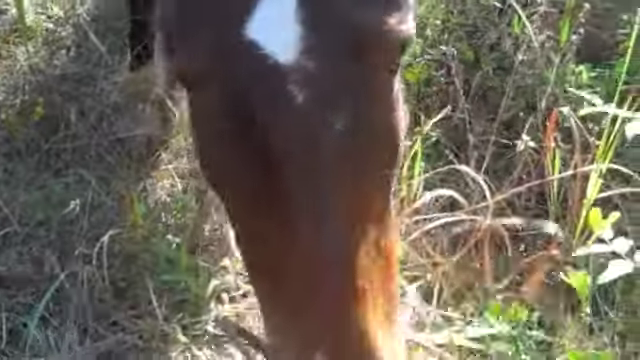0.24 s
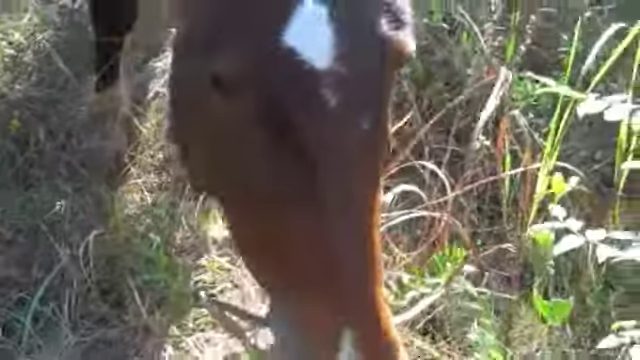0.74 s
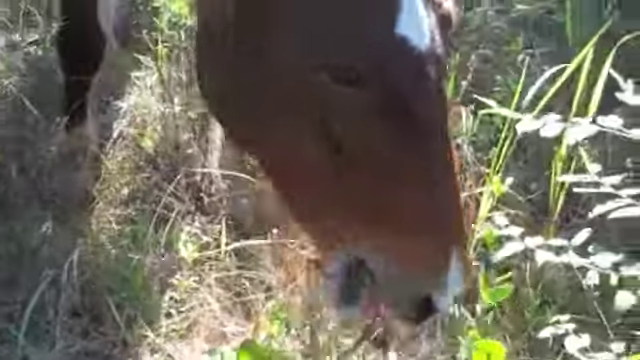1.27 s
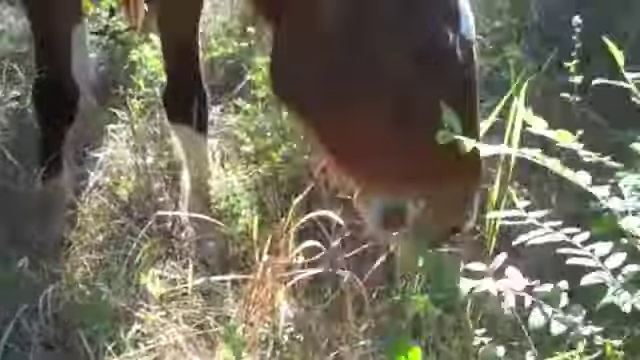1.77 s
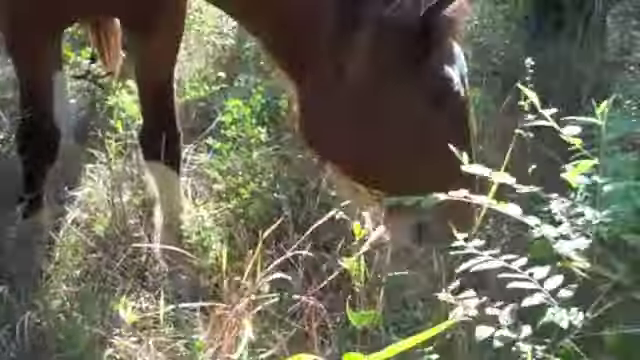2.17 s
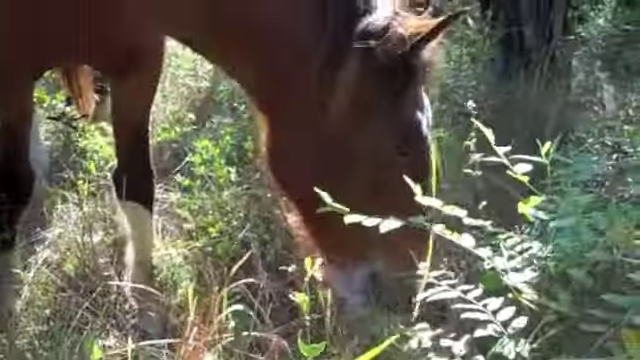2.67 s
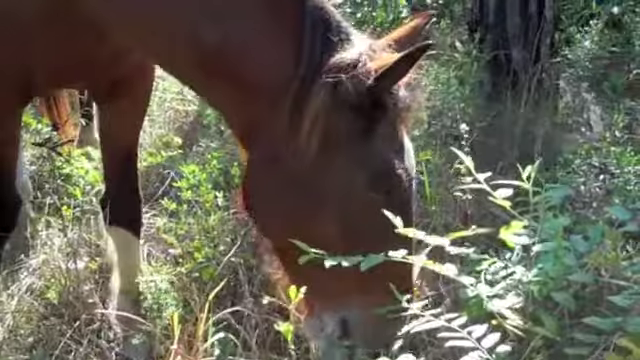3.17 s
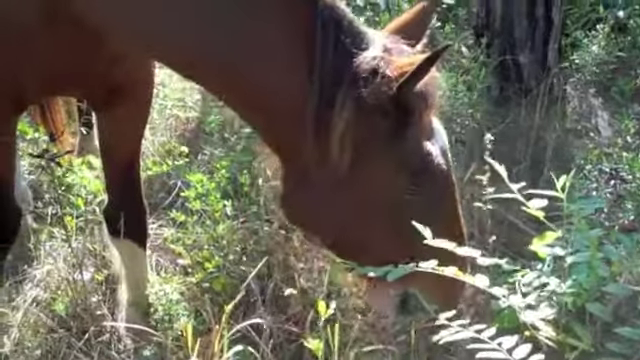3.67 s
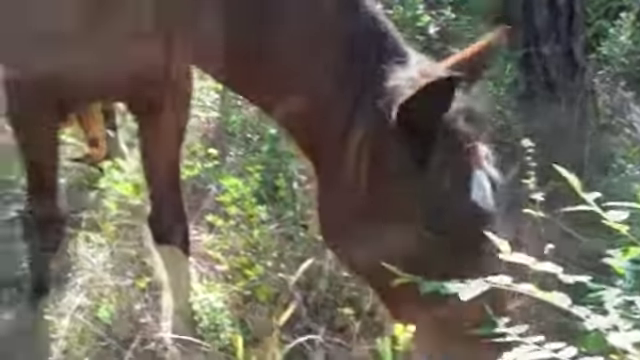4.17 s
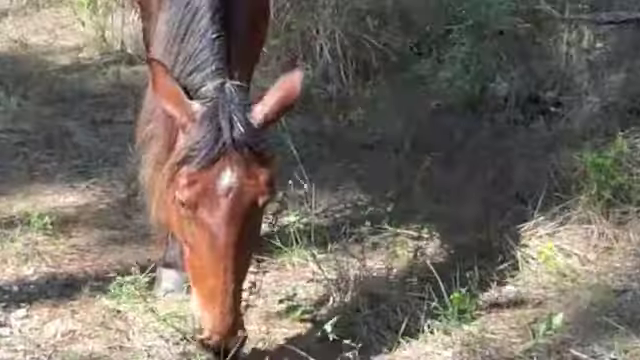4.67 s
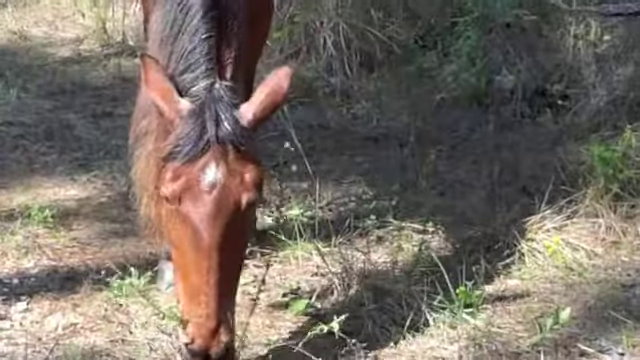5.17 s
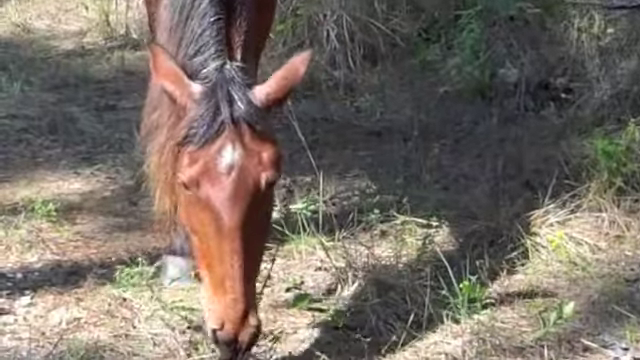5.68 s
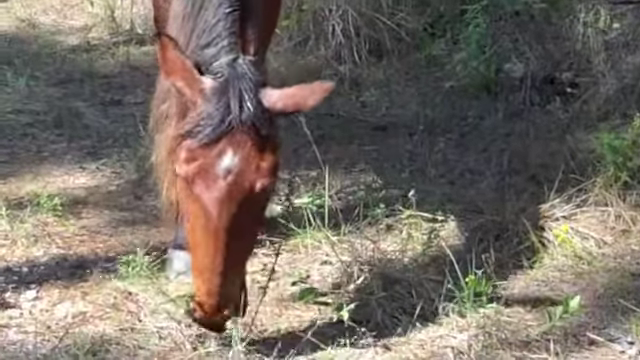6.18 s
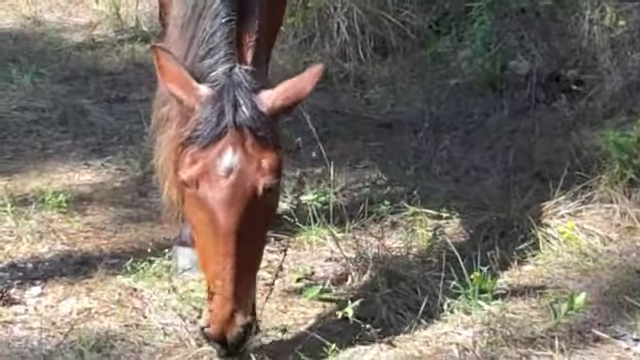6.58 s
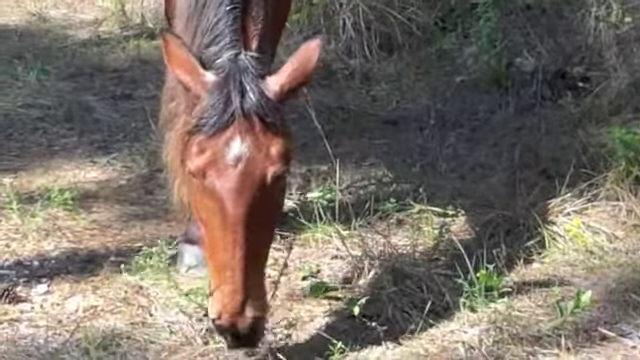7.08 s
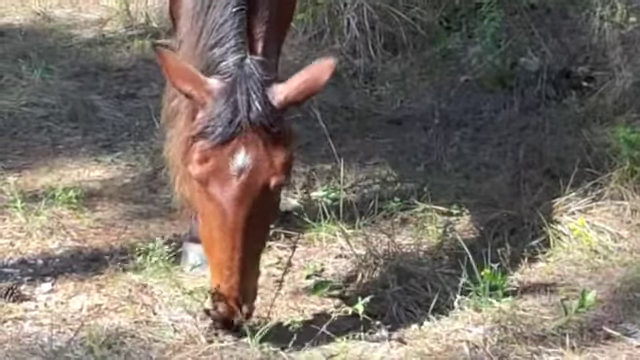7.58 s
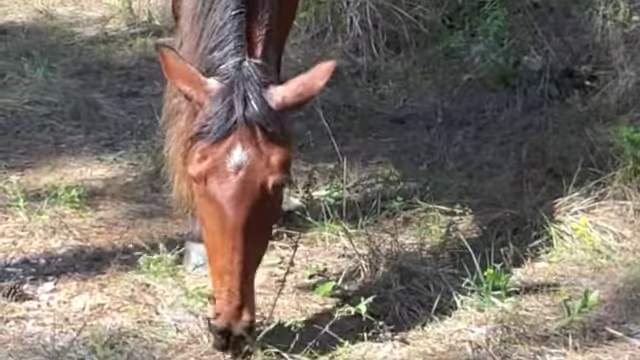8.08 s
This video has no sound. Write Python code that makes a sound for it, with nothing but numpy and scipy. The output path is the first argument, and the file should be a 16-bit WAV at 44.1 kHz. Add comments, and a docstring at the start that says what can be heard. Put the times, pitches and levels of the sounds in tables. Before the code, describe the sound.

A horse close by tears and munches brush in crisp crackling crunches, then after a cut nibbles short grass much more softly as a bird chips.

```python
"""A horse grazes in brush close to a small camera: leaves and stalks crackle as uneven noise, stems snap and teeth
knock as short decaying tones, the jaw grinds and the mouthful squelches as low crackle bands.
Lumpy low noise makes wind puffs on the microphone ports; a murmur of air fills the wood. The near view stops short
and a farther one fades in: softer nibbling of short grass, chips of a bird (falling tones with a noisy echo) and
a far twitter (a fluttering narrow noise band)."""
import sys
import numpy as np
from scipy import signal
from scipy.fft import rfft, irfft, next_fast_len
from scipy.io import wavfile
from scipy.ndimage import uniform_filter1d, map_coordinates

SR = 44100
rng = np.random.default_rng(int(sys.argv[2]) if len(sys.argv) > 2 else 0)


def to_wav(sig):
    """Store sig (one row per channel, or 1-D mono) as 16-bit WAV at the path in sys.argv[1].

    Samples outside -1..1 are clipped; the rate is SR.
    """
    pcm = np.clip(np.atleast_2d(sig), -1, 1) * 32767
    pcm = np.round(pcm).astype(np.int16)
    wavfile.write(sys.argv[1], SR, pcm.T)  # frames by channels


N = 367353

CUT_S = 4.197  # the near view ends and the far view starts


def amp(db):
    """Gain of a level in dB."""
    return 10 ** (np.asarray(db) / 20)


def unit(x):
    """Bring x to rms 1."""
    return x / np.sqrt(np.mean(x ** 2) + 1e-20)


def along(points, hz):
    """Read (frequency [Hz], value) points on a log frequency axis."""
    point_hz, value = np.transpose(points)
    return np.interp(np.log(hz + 1), np.log(point_hz + 1), value)


def curves(rows):
    """One value per sample for each column after the time."""
    s, *columns = np.transpose(rows)
    return [np.interp(np.arange(N) / SR, s, column) for column in columns]


def wobble(rate):
    """A smooth random curve with rate knots a second."""
    knots = rng.standard_normal(int(N * rate / SR) + 4)
    return map_coordinates(knots, [np.arange(N) * rate / SR])


def filtered(x, response):
    """Shape x by a response over frequency, complex if it shifts phase."""
    size = next_fast_len(N + 8192)
    spectrum = rfft(x, size) * response(np.fft.rfftfreq(size, 1 / SR))
    return irfft(spectrum, size)[..., :N]


def spread(pair, spectrum, alike):
    """Colour two unrelated signals and mix them to a left-right likeness, at rms 1."""
    def mid_side_gains(hz):
        turn = np.arccos(np.clip(along(alike, hz), -1, 1)) / 2
        return amp(along(spectrum, hz)) * np.array([np.cos(turn), np.sin(turn)])

    mid, side = filtered(pair, mid_side_gains)
    return unit(np.array([mid + side, mid - side]))


def swells(rows, rest_db):
    """Level in dB for each column: every event swells and fades, adding its power to the rest level."""
    rise_share = 0.73  # a swell rises in this share of its fading time
    roundness = 1.28  # 1 = pointed peak, 2 = round
    t, rows = np.arange(0, N / SR + .002, .002), np.array(rows)
    fade_s = np.maximum(rows[:, 1:2], .005)  # zero and negative times become 5 ms
    since = (t - rows[:, :1]) / fade_s
    shape = amp(-20 * np.maximum(since, -since / rise_share) ** roundness)  # a power: -10 dB at since = 1
    event_power = amp(2 * rows[:, 2:].T) @ shape
    power = [np.interp(np.arange(N) / SR, t, p) for p in event_power]
    return 10 * np.log10(power + amp(2 * np.asarray(rest_db)))


def murmur():
    """Far air in the trees and the hiss of the microphone: coloured noise, gently unsteady."""
    # colour of the wood: (frequency [Hz], relative level per Hz [dB])
    wood = [(35, -49), (60, -12.5), (125, -10.5), (315, -6.5), (397, -3), (690, -0.5), (953, -5.5),
            (1090, -6), (1380, -9.5), (1780, -11), (4680, -20.5), (7080, -19), (9330, -24.5),
            (13500, -24.5), (14800, -44)]
    # stereo width: (frequency [Hz], left-right likeness [-1 to 1])
    alike = [(60, -0.76), (180, 0.26), (550, 0.86), (1640, 0.079), (4960, -0.81), (14900, 0.45)]
    # balance: (frequency [Hz], left over right [dB])
    left = [(60, 8), (240, 4.5), (950, 0), (3760, 4), (14900, -8)]
    near_db, far_db = -54.5, -57
    air_db = np.where(np.arange(N) / SR < CUT_S, near_db, far_db)
    air = spread(rng.standard_normal((2, N)), wood, alike)
    balanced = filtered(air, lambda hz: amp([[.5], [-.5]] * along(left, hz)))
    return amp(air_db + 0.79 * wobble(6.2)) * balanced


def twitter():
    """A far bird, blurred by the wood into a fluttering narrow band of noise."""
    # calls: (peak time [s], time to fade by 10 dB [s], peak level [dB])
    calls = [(5.56, .06, -64), (5.72, 0.2, -66), (5.85, 0.2, -72), (6.2, -0.5, -76)]
    level_db = swells(calls, -100)
    band = [(2300, -30), (2750, -4), (3000, 5), (3200, -5), (3600, -34)]  # (Hz, relative dB)
    noise = spread(rng.standard_normal((2, N)), band, [(3000, 0.67)])
    return amp(level_db + 3.3 * wobble(32)) * noise


def bird():
    """A short falling chip, smeared by the many trunks that send it back."""
    # chips: (time [s], level [dB], settled pitch [Hz], left over right [dB])
    chips = [(4.704, -40.5, 7080, 4), (5.943, -45.5, 6820, 4), (7.341, -48, 6930, 3)]
    out = np.zeros((2, N + SR))
    t, late = np.arange(SR // 50) / SR, np.arange(SR // 3) / SR
    for s, db, hz, pan_db in chips:
        pitch = hz * (1 + 0.095 * np.exp(-t / 0.0029))
        swell = np.sin(np.pi * t / t[-1]) ** 0.29
        chip = swell * np.sin(2 * np.pi * np.cumsum(pitch) / SR)
        trunks = 0.037 * amp(-60 * late / 0.25) * rng.standard_normal((2, len(late)))
        trunks[:, 0] = 1  # the direct sound
        heard = signal.fftconvolve(chip[None], trunks, axes=1)
        gain = amp(db + np.array([[pan_db], [-pan_db]]) / 2)
        out[:, round(s * SR):][:, :heard.shape[1]] += gain * heard
    return out[:, :N]


def wind():
    """Lumpy puffs of low noise, unrelated from port to port."""
    # puffs: (peak time [s], time to fade by 10 dB [s], peak level [dB])
    gusts = [(.08, 0.1, -58), (.69, -0.01, -44), (1.13, 0, -56), (1.35, 0.1, -60), (2.15, .04, -58),
             (2.34, 0.07, -52.5), (2.77, 0.1, -61), (3.2, .04, -54), (3.3, 0.09, -47), (3.5, .06, -54),
             (3.63, 0.16, -51), (4.06, 0.18, -46.5), (4.25, -0.1, -62), (4.905, 0.05, -53)]
    # colour of a puff: (frequency [Hz], relative level [dB])
    puff = [(15, -7), (30, -2), (55, -3.5), (100, -7.5), (180, -22), (300, -55)]
    calm_db = -78.5
    lumps = amp(2.8 * np.array([wobble(14), wobble(19)]))
    noise = spread(rng.standard_normal((2, N)), puff, [(50, 0)])
    return amp(swells(gusts, calm_db)) * unit(lumps * noise)


def rings(s, db, hz, cycles, rise, ragged):
    """Each break swells over a part of a cycle and rings out; a ragged one splinters on for some milliseconds."""
    out, t = np.zeros(N + SR), np.arange(SR // 12) / SR
    turns = np.c_[hz] * t
    splinter = uniform_filter1d(rng.standard_normal(turns.shape), size=5, axis=1) * amp(-60 * t / 0.0078)
    decay = amp(-60 * turns / np.c_[np.clip(cycles, 1, 60) + 0 * hz])  # cycles to fall by 60 dB
    attack = 1 - np.exp(-turns / rise)
    sound = np.c_[amp(db)] * (decay + ragged * splinter) * attack * np.sin(2 * np.pi * turns)
    start = np.round((s + .001) * SR).astype(int)  # 1 ms after the listed time
    np.add.at(out, np.c_[start] + np.arange(len(t)), sound)
    return out[:N]


def thuds():
    """The jaw closes with soft, low, smoothly ringing thuds."""
    # thuds: (time [s], level [dB], pitch [Hz])
    thud_rows = [(0.068, -46, 185), (0.712, -46, 290), (0.779, -42, 269), (1.337, -35, 398),
                 (2.123, -40, 268), (2.385, -40, 285), (2.759, -52, 283), (3.059, -39, 305),
                 (3.12, -43, 261), (3.23, -34.5, 390), (3.441, -39, 229), (3.884, -39.5, 308),
                 (4.033, -43, 250), (4.46, -45.5, 199), (4.774, -49.5, 231), (5.044, -44, 197),
                 (5.088, -36.5, 278), (5.155, -48, 248), (5.724, -39, 238), (5.979, -52, 342),
                 (6.348, -42.5, 248), (6.427, -42, 201), (6.979, -41.5, 237), (7.189, -43.5, 270),
                 (7.749, -54, 172), (7.844, -55, 223)]
    return rings(*np.transpose(thud_rows), cycles=18.0, rise=0.86, ragged=0)


def knocks():
    """Teeth knock and the mouth pops: fast attacks on short rings."""
    # knocks: (time [s], level [dB], pitch [Hz], ring to -60 dB [cycles])
    knock_rows = [(0.069, -37, 759, 13), (0.13, -36, 2050, 12), (0.476, -33, 1730, 15),
                  (0.715, -32, 1390, 18), (0.93, -29.5, 1300, 13), (1.09, -38, 630, 9.8),
                  (1.323, -39, 690, 12), (1.359, -35, 754, 14), (1.566, -37, 745, 14),
                  (2.576, -46, 845, 12), (3.329, -33, 1500, 18), (3.335, -31.5, 1580, 29),
                  (3.344, -34, 1350, 17), (3.413, -38, 794, 12), (3.443, -25.5, 570, 19),
                  (3.76, -19.5, 650, 6.6), (3.786, -30.5, 780, 11), (3.958, -22.5, 870, 9.9),
                  (4.41, -45, 560, 12), (4.894, -20, 1720, 16), (4.905, -34, 810, 28),
                  (4.962, -41, 1780, 18), (5.087, -33, 1270, 12), (5.115, -36, 1210, 12),
                  (5.148, -39, 1140, 15), (5.188, -42, 1650, 18), (5.35, -35, 1140, 8.2),
                  (5.736, -38, 1120, 14), (6.337, -39.5, 620, 13), (6.419, -43, 638, 12),
                  (6.557, -37.5, 690, 11), (6.574, -34, 1100, 12), (6.735, -42, 800, 12),
                  (6.899, -35.5, 820, 9.4), (7.199, -38.5, 655, 13), (7.359, -38, 743, 13),
                  (7.583, -39.5, 830, 14), (7.976, -37, 1390, 16), (7.981, -40, 1900, 16)]
    return rings(*np.transpose(knock_rows), rise=0.13, ragged=0.14)


def snaps(leaf_db, stalk_db):
    """A stem cracks high and its stalk rings, mostly lower; 60 small twigs snap at random times."""
    # clearest stems: (time [s], crack level [dB], crack pitch [Hz], stalk ring level [dB], stalk ring pitch [Hz])
    stems = [(.0702, -10, 6060, -22, 2720), (.1245, -17, 7020, -36, 5000), (.129, -12.5, 7560, -35, 4010),
             (.163, -13, 7960, -27, 3110), (.168, -14, 5900, -28, 2500), (.1944, -20, 7200, -36, 4860),
             (0.2176, -16, 7100, -39, 4900), (0.533, -18, 5900, -43, 4950), (.5643, -26, 6000, -24, 4870),
             (.6312, -24, 5200, -22, 4830), (.685, -30, 7000, -40, 4800), (0.7611, -21, 6600, -15, 4960),
             (0.8497, -24.5, 6350, -26, 4480), (.93, -33, 6860, -36, 2630), (1.0324, -27, 6470, -33, 4160),
             (1.0734, -22, 6740, -33, 4430), (1.1505, -20, 6870, -49, 4020),
             (1.2303, -21.5, 6700, -25, 3820), (1.2514, -24, 6400, -28, 3320),
             (1.4148, -20, 6540, -27, 3500), (1.6007, -22, 6420, -42, 5000), (1.6157, -22, 6270, -46, 3560),
             (1.7672, -20.5, 6300, -48, 4230), (1.776, -24, 6270, -48, 4230),
             (1.8654, -24, 6950, -32, 4840), (1.8861, -23, 6170, -31, 4200), (1.895, -24, 6300, -38, 5100),
             (1.915, -21, 6600, -40, 3820), (2.1201, -21, 6260, -35, 4620), (2.163, -14, 6640, -36, 4640),
             (2.1831, -21, 6500, -21.5, 3800), (2.2003, -20, 5900, -33, 3360),
             (2.2574, -25, 6310, -26, 4500), (2.459, -35, 6300, -34, 2600), (2.5364, -25, 6850, -37, 3640),
             (2.6554, -34, 6990, -28, 3590), (2.7032, -24, 6150, -39, 3460),
             (2.8612, -20.5, 7400, -33, 4490), (3.0834, -21, 6300, -37, 4900),
             (3.1583, -44, 6720, -27, 3950), (3.272, -25, 6730, -41, 4800), (3.286, -21, 7160, -38, 5000),
             (3.4128, -16, 6740, -19, 5000), (3.4459, -18, 5700, -21, 3450), (3.4627, -25, 6600, -18, 1930),
             (3.4872, -22, 6100, -29, 2050), (3.5346, -19, 6500, -29, 3380), (3.664, -28, 6970, -40, 2100),
             (3.83, -25, 7300, -36, 4410), (3.9568, -18.5, 7600, -36, 2000), (4.1642, -28, 6640, -49, 3260),
             (4.4095, -46, 7710, -38, 2360), (4.7437, -51, 7140, -40.5, 2340),
             (4.893, -27, 5400, -27, 3080), (4.9053, -27, 6800, -40, 4000), (4.9477, -36, 6820, -38, 4660),
             (5.089, -40, 5470, -37, 2370), (5.1484, -36, 6060, -42, 3800), (5.187, -31, 6000, -43, 4030),
             (5.3258, -44, 6610, -45, 3330), (5.3353, -46, 6770, -45, 3010), (5.3722, -39, 6260, -44, 2630),
             (5.514, -48, 6830, -34.5, 3900), (5.569, -40, 7200, -50, 3080), (5.6934, -59, 7860, -43, 2800),
             (5.7667, -52, 6270, -43, 3710), (5.877, -42, 6060, -51, 2710), (5.9794, -44, 5300, -49, 2900),
             (6.0037, -48, 7050, -45, 2890), (6.1384, -43, 6430, -40.5, 4830),
             (6.337, -44, 6820, -40, 2250), (6.7775, -40, 7300, -60, 3260), (7.0376, -38, 6120, -44, 4320),
             (7.219, -47, 6730, -50, 2660), (7.2814, -51, 6450, -45, 2440), (7.4163, -34, 7560, -56, 4020),
             (7.439, -42, 5200, -55, 4870), (7.9754, -49, 5660, -40, 2270), (8.0566, -41, 6900, -60, 4520),
             (8.111, -40.5, 5030, -54, 2220)]
    at, chance = rng.integers(N, size=60), rng.standard_normal((4, 60))
    scatter_db = 4.5
    twigs = [at / SR,
             leaf_db[at] + 12.5 + scatter_db * chance[0],  # crack, dB over the leaves
             6700 * np.exp(0.081 * chance[1]),  # crack Hz
             stalk_db[at] + 11 + scatter_db * chance[2],  # ring, dB over the stalks
             3800 * np.exp(0.22 * chance[3])]  # ring Hz
    s, crack_db, crack_hz, ring_db, ring_hz = np.hstack([np.transpose(stems), twigs])
    cracks = rings(s, crack_db, crack_hz, cycles=24.5, rise=1.07, ragged=0.82)
    stalks = rings(s, ring_db, ring_hz, cycles=25.4, rise=0.73, ragged=0.56)
    return cracks + stalks


def crackle(spectrum, spike_db, clump_db, clump_rate, hiss):
    """Countless tiny breaks of very uneven size, in clumps and patches of pitch, over a share of smooth friction."""
    # stereo width of the horse: (frequency [Hz], left-right likeness [-1 to 1])
    alike = [(100, 1), (300, 0.92), (2400, 1), (5200, 0.8), (6500, 0.73), (9000, 0.57), (14000, .1)]
    rarity = np.minimum(rng.exponential(size=N), 6.5)  # caps the rarest, loudest breaks
    size = amp(spike_db * rarity + clump_db * wobble(clump_rate))
    tiny_breaks = unit(size * rng.standard_normal((2, N)))
    friction = hiss * rng.standard_normal((2, N))
    z = signal.stft(tiny_breaks, nperseg=128)[2] + signal.stft(friction, nperseg=128)[2]
    patches = uniform_filter1d(rng.standard_normal(z.shape[1:]), size=3, axis=0)  # over pitch
    patches = uniform_filter1d(patches, size=5, axis=1)  # over time
    patchy = signal.istft(z * amp(2.05 * unit(patches)), nperseg=128)[1][:, :N]
    return spread(patchy, spectrum, alike)


def chewing(wet_db):
    """At each stroke of the jaw the molars grind low and the wet mouthful squelches."""
    # strokes: (peak time [s], time to fade by 10 dB [s], molar grind level [dB], wet mouthful level [dB])
    chews = [(.08, .03, -52, -52), (.51, -0.04, -68, -54), (.73, 0.09, -48, -48.5), (1.08, -0.1, -78, -54),
             (1.37, .1, -51, -52.5), (2.14, 0.07, -53.5, -54.5), (2.4, 0.1, -58, -58),
             (2.59, -0.12, -72, -52), (2.76, 0.05, -55, -54), (3.1, 0.06, -59, -54),
             (3.26, 0.09, -54.5, -56), (3.33, -0.05, -75, -47), (3.455, 0.04, -46.5, -36),
             (3.76, 0.1, -62, -55), (4.06, .08, -53.5, -51), (4.47, .04, -60, -61), (4.755, 0.02, -66, -55),
             (4.915, .03, -72, -57), (5.09, 0.1, -55.5, -53.5), (5.44, 0.2, -70, -61),
             (5.75, 0.1, -58.5, -57), (6.344, .06, -61, -52.5), (6.44, 0.03, -57, -57),
             (6.565, .03, -66, -57), (6.99, 0.03, -55, -60), (7.21, 0.13, -65.5, -61.5),
             (7.726, .04, -67, -58), (7.84, -0.07, -59, -58), (7.976, .03, -72, -59)]
    # colour of the grind: (frequency [Hz], relative level [dB])
    jaw_colour = [(120, -11), (190, -5), (250, 0.5), (330, -1.5), (450, -30.5)]
    # colour of the mouthful: (frequency [Hz], relative level [dB])
    mouth_colour = [(350, -27), (550, -3), (800, 1.5), (1300, -3), (1800, -26.5)]
    jaw_rest_db = -72
    jaw_db, mouth_db = swells(chews, [jaw_rest_db + 0 * wet_db, wet_db])
    mouth = crackle(mouth_colour, spike_db=2.5, clump_db=3, clump_rate=50, hiss=0.85)
    jaw = crackle(jaw_colour, spike_db=2, clump_db=2, clump_rate=30, hiss=.6)
    return amp(mouth_db) * mouth + amp(jaw_db) * jaw


def plants(leaf_db, stalk_db):
    """Dry leaves crackle high and stalks lower."""
    # colour of crisp leaves: (frequency [Hz], relative level per Hz [dB])
    leaf_colour = [(2350, -30.5), (4000, -10.5), (5200, -5.5), (6400, 1), (7470, -2.5), (10200, -14),
                   (13600, -22.5), (14600, -24), (14800, -40)]
    # colour of stalks: (frequency [Hz], relative level per Hz [dB])
    stalk_colour = [(710, -43), (1200, -16.5), (1430, -2.5), (2140, -3.5), (2550, -1.5), (3800, -1),
                    (5200, -6), (6760, -28), (11400, -120)]
    leaves = crackle(leaf_colour, spike_db=3.5, clump_db=1.34, clump_rate=130, hiss=0.6)
    stalks = crackle(stalk_colour, spike_db=3.0, clump_db=2, clump_rate=90, hiss=0.32)
    return amp(leaf_db) * leaves + amp(stalk_db) * stalks


def grazing():
    """The horse tugs at the plants, which rustle, crackle and snap, and chews the mouthful."""
    # steady rustle between tugs: (time [s], crisp leaves level [dB], stalks level [dB], wet mouthful level [dB])
    rustle = [(0, -37, -47.5, -56), (.3, -40, -49.5, -55.5), (.65, -41.5, -47, -56),
              (1.0, -41.5, -51.5, -54), (1.5, -44.5, -52, -53.5), (2.0, -48.5, -57, -55),
              (2.45, -44.5, -54.5, -55), (3.0, -47, -56, -54.5), (3.7, -45, -55.5, -53.5),
              (4.19, -51.5, -59, -56.5), (4.2, -69, -69, -66), (4.6, -65, -75, -63.5),
              (5.0, -64, -69.5, -65), (5.6, -68.5, -67.5, -63), (6.5, -68, -70.5, -66),
              (7.5, -67, -70.5, -62.5), (8.33, -68, -68.5, -63)]
    # tugs: (peak time [s], time to fade by 10 dB [s], crisp leaves level [dB], stalks level [dB])
    tugs = [(.136, 0.08, -31, -42), (.235, 0.05, -35.5, -46), (.361, 0.02, -34.5, -42),
            (.455, 0.03, -35, -49), (.56, .04, -32.5, -50), (.68, .04, -38, -50), (.74, 0.1, -45, -42),
            (.812, .08, -39.5, -48), (.924, .04, -46, -48.5), (.99, .03, -43, -56), (1.08, .07, -39.5, -48),
            (1.16, .04, -39, -57), (1.247, .07, -32.5, -45.5), (1.341, 0.09, -40, -46),
            (1.554, 0.04, -42, -49), (1.686, 0.03, -41.5, -56), (1.77, 0.02, -37, -59),
            (1.888, 0.04, -38.5, -51), (2.127, 0.03, -41, -44.5), (2.199, .08, -38, -49),
            (2.42, .06, -49, -62), (2.5, 0.06, -39.5, -50.5), (2.688, 0.0854, -38, -47),
            (2.867, 0.09, -38, -48.5), (3.075, .06, -36.5, -49.5), (3.211, 0.0248, -42, -58),
            (3.289, .05, -37, -49), (3.42, .04, -36, -46), (3.462, 0.0314, -34.5, -31.5),
            (3.544, 0.0326, -38, -42.5), (3.66, .06, -49, -57), (3.829, 0.03, -45, -55),
            (4.055, .07, -42.5, -50.5), (4.398, 0.01, -57, -54.5), (4.514, .08, -64, -67),
            (4.755, 0, -70, -62), (4.905, 0.03, -54, -56), (4.95, 0.02, -57, -64), (4.99, 0, -62, -68),
            (5.04, .03, -61, -59), (5.09, 0.0454, -56, -52), (5.14, 0.05, -57, -56.5),
            (5.35, 0.07, -66, -63), (5.444, 0.07, -56.5, -76), (5.74, .07, -73.5, -63),
            (5.98, .07, -61, -68.5), (6.28, 0.06, -69, -62), (6.344, 0.04, -66, -55), (6.42, 0.1, -68, -62),
            (6.575, 0.03, -70, -58), (7.038, .08, -65, -62), (7.224, 0.07, -62, -64),
            (7.37, .1, -58.5, -77), (7.726, 0.06, -69, -65.5), (7.826, -0.2, -69, -70.5),
            (7.98, 0.03, -66.5, -62), (8.058, .05, -65.5, -79)]
    *plants_db, wet_db = curves(rustle)
    leaf_db, stalk_db = swells(tugs, plants_db)
    breaks = snaps(leaf_db, stalk_db) + knocks() + thuds()
    return plants(leaf_db, stalk_db) + chewing(wet_db) + breaks


def ports(x):
    """The two microphone ports resonate at different treble pitches and shift in phase, mostly the left later."""
    # balance: (frequency [Hz], left over right [dB])
    left = [(300, 0), (1000, 0), (5900, -0.5), (6600, -3.5), (7200, 13.5), (7900, 10), (10000, 7.5),
            (14000, 14.5)]
    # phase: (frequency [Hz], lag of left behind right [rad])
    lag = [(300, .1), (1000, .3), (2000, 0), (5500, .4), (6800, -.1), (8600, 1.3), (10000, 1.8),
           (14000, 2.4)]
    side = np.array([[1], [-1]]) / 2
    return filtered(x, lambda hz: amp(side * along(left, hz)) * np.exp(-1j * side * along(lag, hz)))


def scene():
    """Wood, birds, wind and horse together; after the cut everything fades in."""
    fade_s, fade_from_db = 0.35, -19.5  # slope: full gain per fade_s
    since = np.arange(N) / SR - CUT_S
    fade_in = np.clip(amp(fade_from_db) + since / fade_s, 0, 1)
    fade = np.where(since < 0, 1, fade_in)
    return fade * (murmur() + twitter() + bird() + ports(wind() + grazing()))


def record(dry):
    """The camera keeps nothing above its band limit."""
    top_hz = 14300
    return filtered(dry, lambda hz: hz < top_hz)


dry = scene()
out = record(dry)
to_wav(out)
```